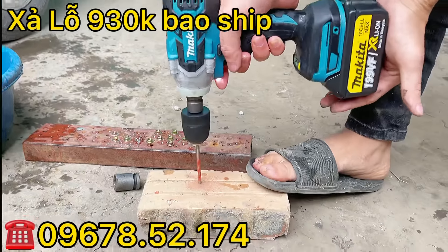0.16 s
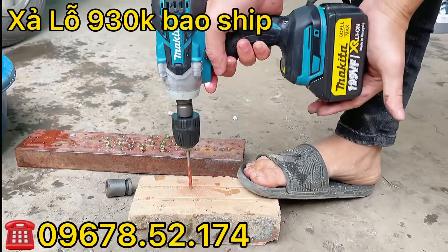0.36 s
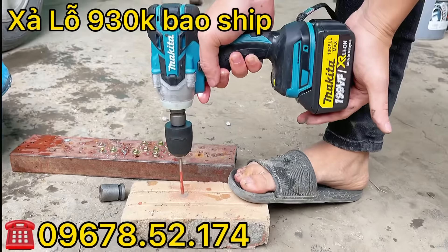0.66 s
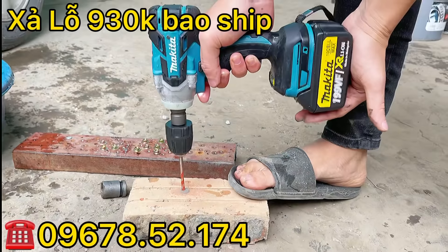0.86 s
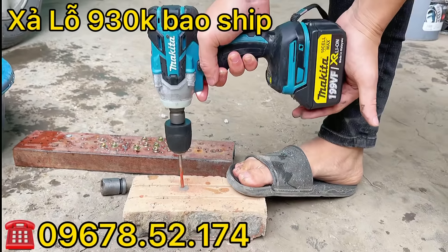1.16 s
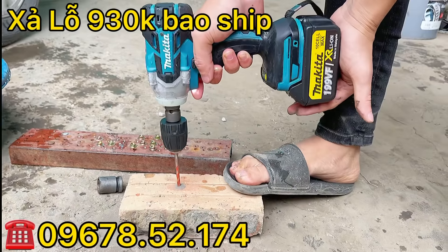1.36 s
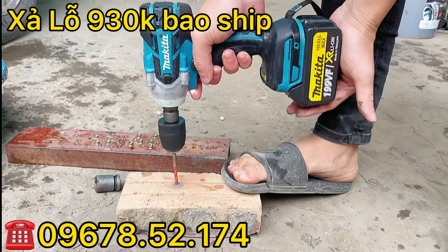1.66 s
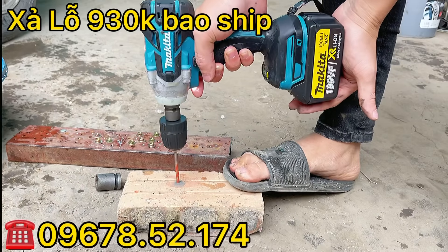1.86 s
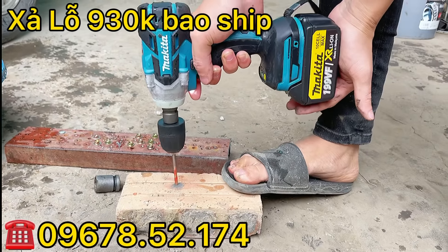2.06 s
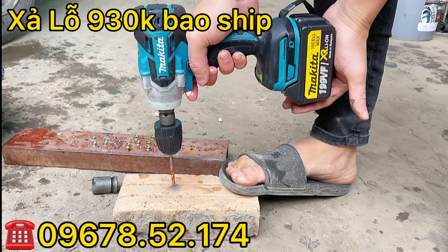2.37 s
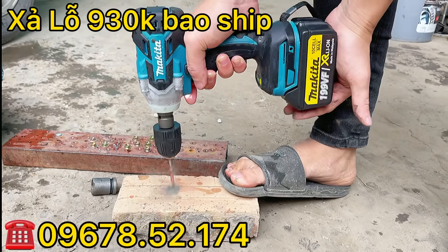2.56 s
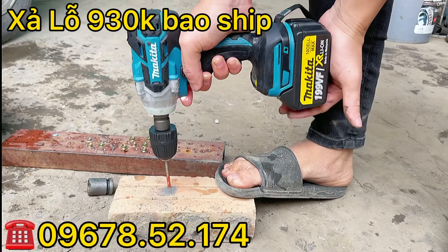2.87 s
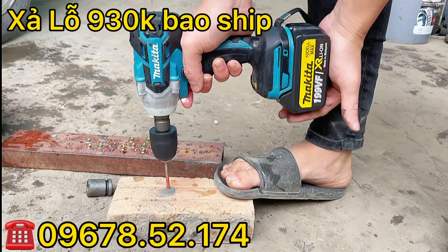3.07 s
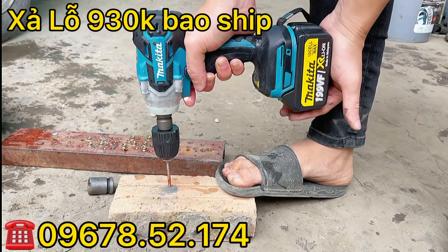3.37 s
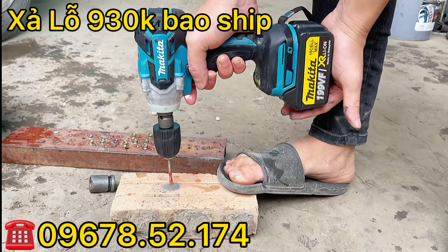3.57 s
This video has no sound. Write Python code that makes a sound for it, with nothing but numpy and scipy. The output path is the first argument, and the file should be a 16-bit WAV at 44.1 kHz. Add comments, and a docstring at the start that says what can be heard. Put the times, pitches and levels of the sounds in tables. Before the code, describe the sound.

Close, harsh power drill chatter: about twenty steel cracks a second over grinding and faint motor whine.

```python
"""A cordless impact drill bores into a brick on a concrete floor, close to the microphone.
From the start its hammer strikes about twenty times a second: cam rasp, steel crack and chuck rattle, brick knock.
Between blows shaped noise makes the bit's drag and short scrapes; a few low thumps and a rumble lie below.
The motor's sine whine sinks in pitch until 2.9 s; drag is weakest from 2.65 to 3.07 s.
Around 3.2 s, as the drag returns, the whine's third harmonic swells; a short room tail follows throughout."""
import sys
import numpy as np
from scipy import signal
from scipy.fft import rfft, irfft, next_fast_len
from scipy.io import wavfile

SR = 44100
rng = np.random.default_rng(int(sys.argv[2]) if len(sys.argv) > 2 else 0)


def transcribe(u):
    """Save the signal u as a 16-bit wav file named by the first command-line argument.

    u: samples, shape (n,) or (channels, n), limited to [-1, 1]; the rate is SR.
    q: integer samples, one column per channel.
    """
    v = np.clip(np.atleast_2d(u).T, -1, 1)
    q = np.round(v * 32767).astype(np.int16)
    wavfile.write(sys.argv[1], SR, q)


N = 163170
T = np.arange(N) / SR
FILTER_HZ = np.fft.rfftfreq(4096, 1 / SR)
FULL_HZ = np.fft.rfftfreq(N, 1 / SR)


def amp(db):
    """Decibels to gain."""
    return 10 ** (np.asarray(db) / 20)


def unit(x):
    """Scales to rms 1."""
    return x / np.sqrt(np.mean(x ** 2) + 1e-20)


def read(points, hz):
    """Reads a spectrum table on a log-frequency axis."""
    f, value = np.transpose(points)
    return np.interp(np.log(hz + 1), np.log(f + 1), value)


def track(points):
    """Interpolates a (time, level) table over the whole scene."""
    return np.interp(T, *np.transpose(points))


def bump(center_s, width_s):
    """Gaussian swell; width_s is the half width at 1/e."""
    return np.exp(-((T - center_s) / width_s) ** 2)


def add(mix, s, sound):
    """Adds a sound at time s."""
    part = mix[max(round(s * SR), 0):][:len(sound)]
    part += sound[:len(part)]


def wander(hz):
    """Smooth chance up to the given rate, rms 1."""
    return unit(irfft(rfft(rng.standard_normal(N)) * (FULL_HZ < hz), N))


def noise():
    """Two unrelated noises: the direct and the scattered part of a sound."""
    return rng.standard_normal((2, N))


# resonances of chuck, bit and housing: (frequency [Hz], width [Hz], height [dB at ring = 1])
RINGS = [(415, 33, 7.5), (509, 160, 8), (953, 126, 2.5), (1290, 53, -4), (1530, 84, 6), (2063, 230, 4),
         (2693, 265, 3.5), (3490, 63, 4.5), (4710, 840, 3.5), (6430, 780, 3.5), (9050, 520, 2.5),
         (9840, 1010, 4)]


def colour(x, spectrum, ring=0):
    """Causal filter of unit energy: a broad spectrum plus the tool's resonances, heights scaled by ring."""
    peaks = sum(g / (1 + (2 * (FILTER_HZ - f) / w) ** 2) for f, w, g in RINGS)
    db = read(spectrum, FILTER_HZ) + ring * peaks
    log_gain = np.log(amp(np.r_[db, db[-2:0:-1]]))
    # minimum phase from the log gain
    taps = np.fft.ifft(np.exp(np.conj(signal.hilbert(log_gain)))).real
    return signal.oaconvolve(x, taps[None] / np.linalg.norm(taps), axes=1)[:, :N]


PATCH_HZ, PATCH_S, PATCH_DB = 130, 0.007, 2.8  # Gaussian sigmas, rms depth


def patchy(x):
    """Short resonances come and go as the contact shifts: random gain over time and frequency."""
    hz, t, z = signal.stft(x, SR, nperseg=512)
    blur_hz = np.exp(-0.5 * ((hz[:15] - hz[7]) / PATCH_HZ) ** 2)
    blur_s = np.exp(-0.5 * ((t[:9] - t[4]) / PATCH_S) ** 2)
    chance = rng.standard_normal(z.shape[1:])
    patches = unit(signal.fftconvolve(chance, np.outer(blur_hz, blur_s), "same"))
    gain = unit(amp(PATCH_DB * patches))
    return signal.istft(z * gain, SR)[1][:, :N]


# hammer blows: (time [s], cam rasp [dB], steel crack [dB before offsets], knock [dB before KNOCK_DB])
BLOWS = [(.0016,-12,-5.5,-18),(0.0385,-26,-6,-16),(0.1025,-21,-1,-11),(.1681,-15.5,-5,-12.5),(0.2372,-24,-4,-17.5),(.3078,-19.5,-4.5,-18),(0.3644,-23,-5.5,-15.5),(0.403,-18.5,-8.5,-20),(.4534,-27,-8,-17.5),(0.4601,-23,-9.5,-18),(0.5109,-20.5,-5.5,-18),(0.5765,-20,-7,-18),(0.6466,-20.5,-7,-16),(0.6791,-28,-5,-18),(.7532,-24,-6.5,-15.5),(0.8034,-19,-6,-18.5),(0.8498,-18.5,-6,-15),(0.8977,-15.5,-4.5,-17),(.947,-17.5,-5.5,-18),(0.9937,-15,-6,-23),(1.0427,-19.5,-2.5,-18.5),(1.088,-18,-6,-15),(1.122,-24,-7,-16),(1.1649,-17,-7,-25),(1.2139,-23,-5,-18),(1.265,-22,-5.5,-29),(1.311,-22,-7,-17.5),(1.361,-21,-5,-16.5),(1.4098,-17,-5,-18.5),(1.4604,-17,-7.5,-16),(1.5062,-18.5,-6.5,-17.5),(1.5568,-19,-6,-16),(1.6082,-18,-5,-20.5),(1.6584,-19,-5,-14.5),(1.7052,-16,-6,-16.5),(1.755,-17.5,-3.5,-17),(1.809,-14.5,-5,-16.5),(1.856,-16,-5.5,-19),(1.9,-38,-6.5,-17),(1.9782,-15.5,-6.5,-15),(2.0196,-24,-4.5,-13.5),(2.067,-28,-6,-17),(2.0934,-17.5,-11,-15.5),(2.123,-16,-6,-17.5),(2.1948,-18,-5,-18),(2.219,-19,-9,-28),(2.2398,-14.5,-10,-23),(2.2819,-14,-4.5,-20),(2.3066,-22,-10.5,-20),(2.3294,-19,-4,-22),(2.385,-12,-6.5,-19),(2.4063,-17,-12,-23),(2.4353,-31,-3.5,-20.5),(2.4661,-26,-3,-17),(2.5317,-20.5,-4.5,-19.5),(2.5818,-19.5,-7.5,-21),(2.6181,-21,-6.5,-18),(2.657,-21,-5.5,-14),(2.733,-15,-6,-21),(2.772,-16,-6,-16),(2.81,-17.5,-7,-21),(2.849,-21,-8,-19.5),(2.8874,-25,-7.5,-20),(2.9266,-21,-6.5,-13),(2.9878,-17.5,-6,-20.5),(3.0779,-14,-6.5,-15.5),(3.1158,-19,-4.5,-18),(3.155,-17.5,-9,-16),(3.2007,-17,-5,-23),(3.2513,-18,-6,-19),(3.2989,-18.5,-4,-21),(3.352,-17.5,-6.5,-19),(3.3997,-27,-8.5,-19),(3.453,-16,-3.5,-19),(3.5015,-23,-6,-20),(3.5402,-21,-7.5,-17.5),(3.5707,-18,-7.5,-23),(3.592,-20,-7,-23),(3.6307,-17,-9,-24),(3.6795,-26,-5.5,-22)]
# steel crack spectrum: (frequency [Hz], relative density [dB])
CRACK = [(60, -19), (400, -42), (1000, -45), (2000, -9.5), (4500, -13.5), (7500, 0), (10000, -1.5),
         (11500, -5.5), (13300, -13.5), (15500, -49)]
# chuck rattle spectrum: (frequency [Hz], relative density [dB])
RATTLE = [(60, 0), (400, -18.5), (1000, -3.5), (2000, 0), (4500, 0.5), (7500, 2.5), (10000, 3.5),
          (11500, 1), (13300, -18), (15500, -12.5)]
# levels are offsets from the crack column of BLOWS
TICK_DB = 2.4794
CRACK_RISE_S, CRACK_DECAY_S, CRACK_DB = 0.0005, 0.00078, 1
BOUNCE_S, BOUNCE_DB = 0.00617, -8
RATTLE_DELAY_S, RATTLE_RISE_S, RATTLE_DECAY_S, RATTLE_DB = 0.00011, 0.0015, 0.0061, -3


def cracks():
    """Hammer meets anvil: hard tick, a millisecond of steel crack, small rebound; then the chuck rattles."""
    t = T[:SR // 10]
    tick, crack, rattle = np.zeros((2, N)), np.zeros(N), np.zeros(N)
    snap = np.minimum(t / CRACK_RISE_S, 1) * np.exp(-np.maximum(t - CRACK_RISE_S, 0) / CRACK_DECAY_S)
    shake = (1 - np.exp(-t / RATTLE_RISE_S)) * np.exp(-t / RATTLE_DECAY_S)
    for s, _, db, _ in BLOWS:
        add(tick[0], s + CRACK_RISE_S, amp([db + TICK_DB]))  # one sample, direct part only
        add(crack, s, amp(db + CRACK_DB) * snap)
        add(crack, s + BOUNCE_S * rng.uniform(0.75, 1.2), amp(db + BOUNCE_DB) * snap)
        add(rattle, s + RATTLE_DELAY_S, amp(db + RATTLE_DB) * shake)
    steel = colour(tick + crack * noise(), CRACK, ring=0.97)
    return steel + patchy(colour(rattle * noise(), RATTLE, ring=2.0))


# cam rasp spectrum: (frequency [Hz], relative density [dB])
CAM = [(60, -13.5), (140, -7), (210, 0.5), (290, 0), (450, -7), (680, -1.5), (1200, 7.5), (2000, -1),
       (5000, 2), (10000, -4.5), (12000, -7), (13500, -45)]
CAM_LEAD_S, CAM_WIDTH_S = 0.0034, 0.0056


def cam():
    """The hammer rasps up its cam: a noise swell just ahead of each blow."""
    power = sum(amp(db) ** 2 * bump(s - CAM_LEAD_S, CAM_WIDTH_S) for s, db, _, _ in BLOWS)
    return colour(np.sqrt(power) * noise(), CAM, ring=1.0)


# modes of brick and gear case: (frequency [Hz], relative level [dB], t60 [s])
KNOCK = [(422.3, 1, 0.04), (513, -1, 0.041), (578, -11.5, 0.046), (806, 4.5, 0.015), (1026, 11.5, 0.018),
         (1410, 11.5, 0.014), (1566, 1, 0.01)]
KNOCK_DELAY_S, KNOCK_RISE_S, KNOCK_DB = 0.00098, 0.0062, 2
DETUNE, SPREAD_DB = 0.0074, 1.0  # rms per mode; DETUNE is a fraction of pitch


def knocks():
    """Each blow rings the brick and gear case as decaying sines, a little differently every time."""
    t, out = T[:SR // 10], np.zeros((2, N))
    hz, db, t60 = np.transpose(KNOCK)[:, :, None]
    rise = 1 - np.exp(-t / KNOCK_RISE_S)
    for s, _, _, level_db in BLOWS:
        for path in out:
            pitch, size = rng.standard_normal((2, len(KNOCK), 1))
            phase = 2 * np.pi * (hz * (1 + DETUNE * pitch) * t + rng.random(hz.shape))
            modes = amp(db + SPREAD_DB * size - 60 * t / t60) * np.sin(phase)
            add(path, s + KNOCK_DELAY_S, amp(level_db + KNOCK_DB) * rise * modes.sum(0))
    return out


# grinding spectrum: (frequency [Hz], relative density [dB])
GRIND = [(30, -15), (120, -20), (280, -8.5), (450, -8), (680, -8.5), (1200, 1.5), (1850, -2), (4000, -2),
         (8000, -2), (10200, 0), (12000, -7), (13300, -32), (15500, -22)]
# steady drag of the bit in its hole: (time [s], level [dB])
DRAG_DB = [(0,-22),(.66,-26.5),(1.05,-19),(1.89,-20.5),(2.1,-16),(2.45,-20.5),(2.65,-31),(3.07,-31),(3.22,-21.5),(3.48,-20.5),(3.6,-16.5)]
# the bit bites into the brick: (time [s], half length [s], level [dB])
SCRAPES = [(0.073,.011,-14),(0.136,0.014,-11.5),(0.205,0.015,-14),(0.275,0.01,-12.5),(.335,0.0087,-17),(0.427,0.0079,-14),(0.48,0.0098,-11.5),(0.547,0.011,-15),(.613,0.011,-15.5),(0.714,0.012,-14),(0.784,0.0062,-12),(0.83,0.015,-15.5),(0.882,0.011,-15),(0.93,0.013,-16.5),(1.153,0.0064,-20),(1.204,0.0048,-18.5),(1.246,0.0093,-13),(1.3,0.0041,-18),(1.339,0.0031,-15),(1.426,0.01,-17.5),(1.624,0.0061,-22),(1.726,0.006,-19),(1.934,0.0079,-12),(1.964,0.0044,-15.5),(2.007,0.0024,-14),(2.047,0.0065,-14.5),(2.164,0.015,-16),(2.301,0.0075,-14.5),(2.366,0.0074,-12),(2.51,0.0078,-13),(2.558,0.011,-17),(2.695,.012,-14),(3.175,.011,-18),(3.316,0.0065,-17.5),(3.37,0.0067,-18),(3.52,0.011,-19),(3.66,0.006,-12.5)]
# gain at the centre of the mid band: (time [s], level [dB])
MID_DB = [(.6, -6.5), (.8, -0.5), (1.6, -1.5), (2.2, -0.5), (3.7, -2)]
MID_HZ, MID_OCTAVES = 1600, 0.46
RECOIL_S, RECOIL_WIDTH_S, RECOIL_DB = 0.014, 0.0036, -2.5
CHATTER_DB, CHATTER_HZ = 1.0, 300
GRAINS_PER_S, GRAIN_SPREAD_DB = 22000, 1


def grinding():
    """The bit drags and bites in separate scrapes, crushing grit in swells of tiny clicks."""
    # the bit lifts briefly after each blow
    recoil = sum(bump(s + RECOIL_S, RECOIL_WIDTH_S) for s, _, _, _ in BLOWS)
    drag = amp(track(DRAG_DB) + RECOIL_DB * recoil)
    power = drag ** 2 + sum(amp(db) ** 2 * bump(s, width_s) for s, width_s, db in SCRAPES)
    level = np.sqrt(power) * amp(CHATTER_DB * wander(CHATTER_HZ))

    hits = rng.random(N) < GRAINS_PER_S / SR
    grit = hits * amp(GRAIN_SPREAD_DB * np.minimum(rng.exponential(1, N), 4))
    scrape = patchy(colour(level * unit(grit * noise()), GRIND, ring=1.0))

    band = np.exp(-0.5 * (np.log2((FULL_HZ + 1) / MID_HZ) / MID_OCTAVES) ** 2)
    mid = irfft(rfft(scrape) * band, N)
    return scrape + mid * (amp(track(MID_DB)) - 1)


# gear hiss spectrum: (frequency [Hz], relative density [dB])
MOTOR = [(30, -4), (300, -7.5), (700, -20), (1250, 7.5), (1900, -4.5), (5000, 3.5), (10000, -10),
         (13200, -33)]
# motor whine: (time [s], pitch [Hz], level [dB before flutter])
WHINE = [(.6, 1333, -38), (2.299, 1267, -41), (2.899, 1203, -40.5)]
HISS_DB = -30
WANDER, WANDER_HZ = 0.0158, 63.3  # rms fraction of pitch, fastest rate
FLUTTER_DB, FLUTTER_HZ = 4, 40
THIRD_S, THIRD_WIDTH_S, THIRD_DB = 3.2, 0.2, -36


def motor():
    """Gear hiss and a wavering, fluttering whine; its third harmonic swells around 3.2 s, as the drag returns."""
    s, hz, level_db = np.transpose(WHINE)
    turns = np.cumsum(np.interp(T, s, hz) * (1 + WANDER * wander(WANDER_HZ))) / SR
    fundamental = amp(np.interp(T, s, level_db))
    third = amp(THIRD_DB) * bump(THIRD_S, THIRD_WIDTH_S)
    whine = 0
    for k, gain in [(1, fundamental), (3, third)]:
        flutter = amp(FLUTTER_DB * wander(FLUTTER_HZ))
        tone = np.sqrt(2) * np.sin(2 * np.pi * (k * turns + rng.random((2, 1))))
        whine = whine + gain * flutter * tone
    return whine + amp(HISS_DB) * colour(noise(), MOTOR)


# the tool lurches against the brick: (time [s], level [dB])
THUMPS = [(0.095, -27.5), (.233, -32), (.361, -29), (.402, -40), (.501, -39), (0.636, -34), (.739, -37),
          (1.7, -37), (1.845, -27)]
THUMP_HZ, THUMP_SIGMA_S = 67, 0.0049


def thumps():
    """Dull thumps of the tool's weight: short low cosine bursts, alike in both channels."""
    out = np.zeros(N)
    for s, db in THUMPS:
        swell = np.exp(-0.5 * ((T - s) / THUMP_SIGMA_S) ** 2)
        out += amp(db) * swell * np.cos(2 * np.pi * THUMP_HZ * (T - s))
    return out


# rumble spectrum: (frequency [Hz], relative density [dB])
SHAKE = [(15, -18), (30, -14.5), (65, -1), (110, -16), (155, -2), (220, -5.5), (290, -3), (600, -46.5)]
# rumble: (time [s], level [dB before RUMBLE_OFFSET_DB])
SHAKE_DB = [(0, -45.5), (.6, -49), (1.8, -55.5), (2.9, -74), (3.3, -48.5), (3.7, -58)]
RUMBLE_OFFSET_DB = 7.0


def rumble():
    """A low, lumpy rumble under the drilling: noise shaped by a bass spectrum."""
    return colour(noise(), SHAKE) * amp(track(SHAKE_DB) + RUMBLE_OFFSET_DB)


# likeness of the two microphone ports: (frequency [Hz], likeness [0-1])
SAME = [(200, 0.9), (500, 0.74), (1050, 0.48), (1500, 0.059), (4000, 0.12), (4700, 0.42), (8200, 0.29),
        (9000, 0.93), (15000, 0.26)]
# level difference between ports: (frequency [Hz], left minus right [dB])
LEAN = [(90, -.5), (210, 0.5), (330, 0), (500, -3), (770, 5.5), (1170, 3.5), (1790, 1.5), (2740, -0.5),
        (4190, 3), (8000, 0)]
# phase by which the sound lags at the right port: (frequency [Hz], phase [rad])
RIGHT_LAG = [(600, 0), (3000, 2.5), (4800, 3.3), (5800, 5.6), (7600, 7.1), (8600, 6.2), (11900, .1)]


def ports(x):
    """Spreads direct and scattered sound over the two microphone ports."""
    size = next_fast_len(N + SR // 10)
    hz = np.fft.rfftfreq(size, 1 / SR)
    direct, scattered = rfft(x, size)
    same = np.clip(read(SAME, hz), 0, 1)
    lean = amp(read(LEAN, hz) / 2)  # half the difference on each side
    right = same * direct + np.sqrt(1 - same ** 2) * scattered
    right = right * np.exp(-1j * read(RIGHT_LAG, hz))
    return irfft(np.array([direct * lean, right / lean]), size)[:, :N]


ROOM_T60_S, ROOM_GAP_S, ROOM_DB = 0.09, 0.004, -23


def room(x):
    """A short, weak tail from the floor and walls: convolution with decaying noise."""
    t = T[:SR // 2]
    tail = rng.standard_normal((2, len(t))) * amp(-60 * t / ROOM_T60_S) * (t > ROOM_GAP_S)
    tail = tail / np.linalg.norm(tail[0])
    return amp(ROOM_DB) * signal.fftconvolve(x, tail, axes=1)[:, :N]


def scene():
    """The drill, its thumps and its room."""
    drill = ports(cracks() + cam() + knocks() + grinding() + motor() + rumble())
    return drill + thumps() + room(drill)


CEILING, EDGE_HZ = 0.88, 15900


def record(dry):
    """The loudest peaks are rounded off; then the band limit."""
    held = dry / (1 + (dry / CEILING) ** 8) ** (1 / 8)
    lowpass = signal.firwin(511, EDGE_HZ, window=("kaiser", 7), fs=SR)
    return signal.oaconvolve(held, lowpass[None], "same")


dry = scene()
out = record(dry)
transcribe(out)
```